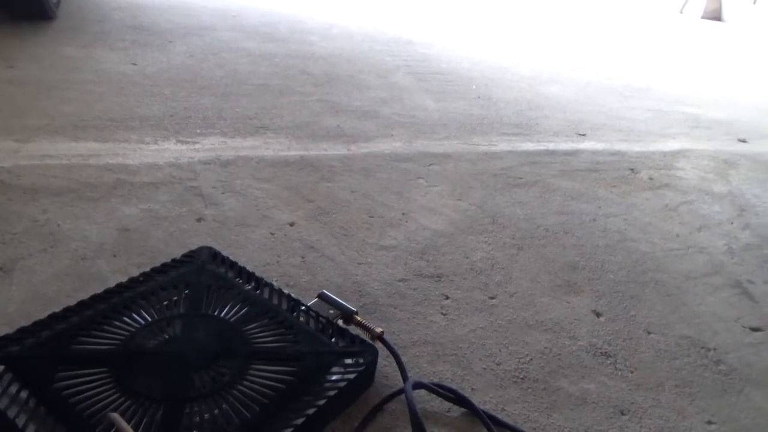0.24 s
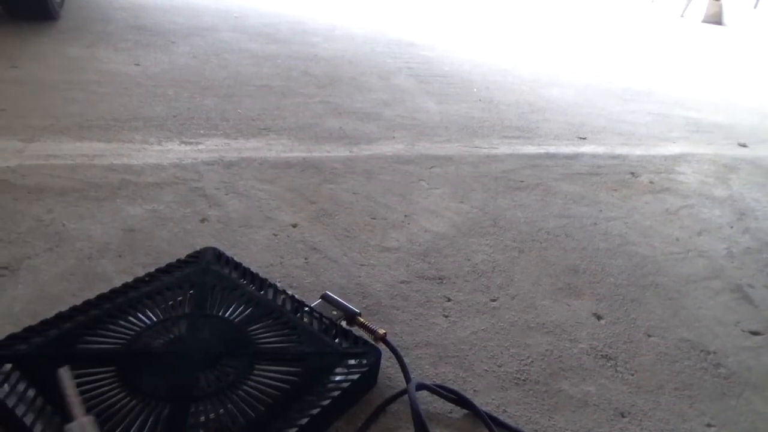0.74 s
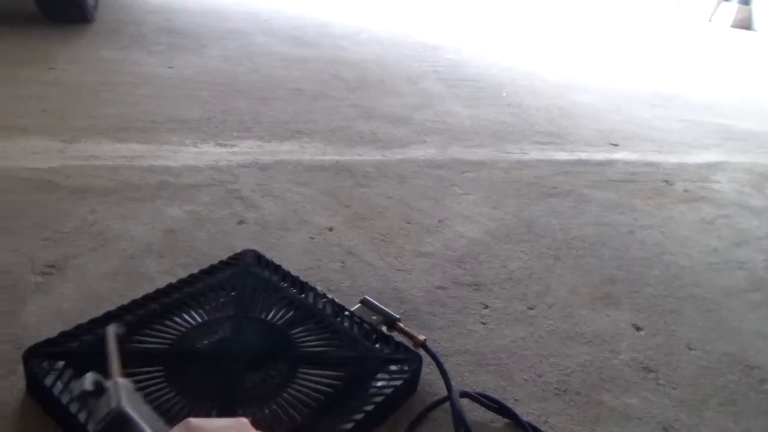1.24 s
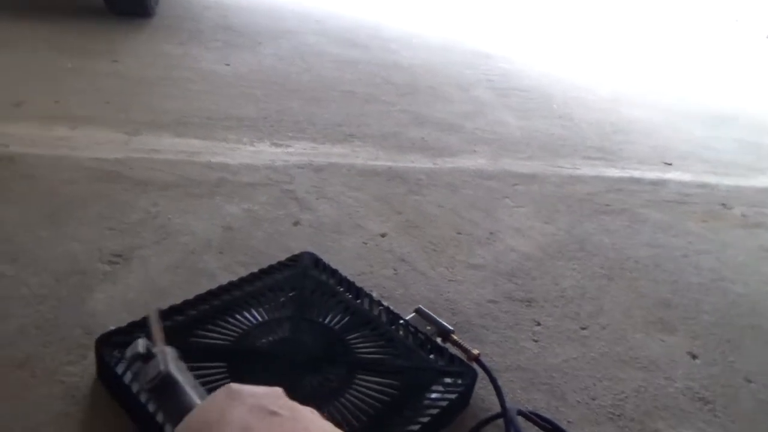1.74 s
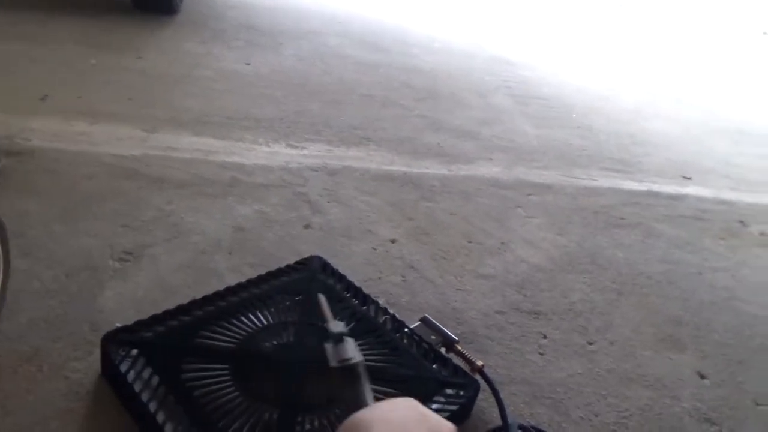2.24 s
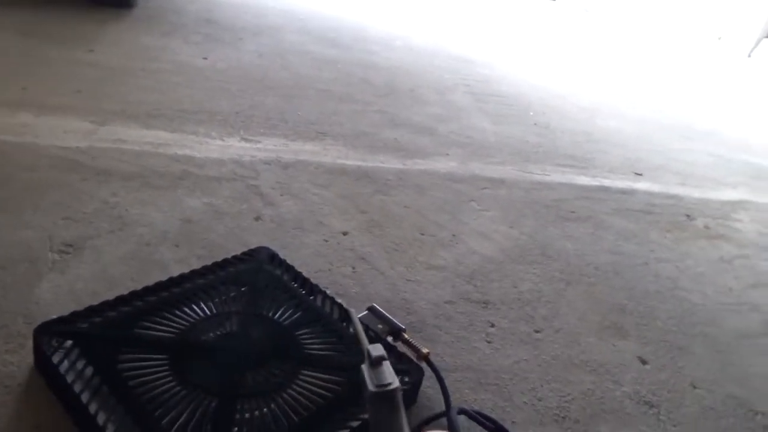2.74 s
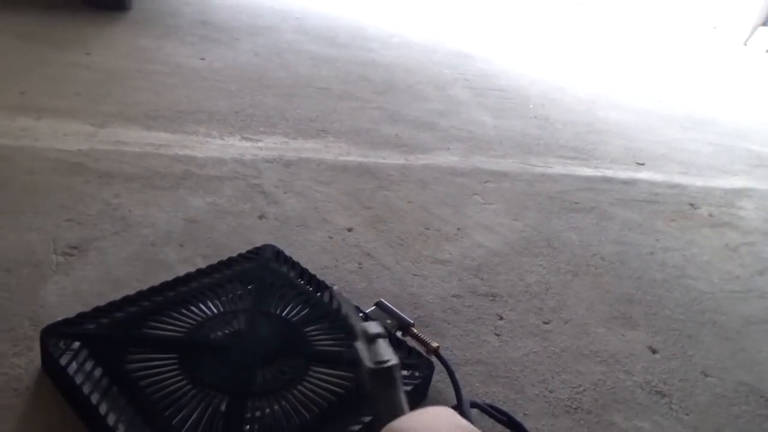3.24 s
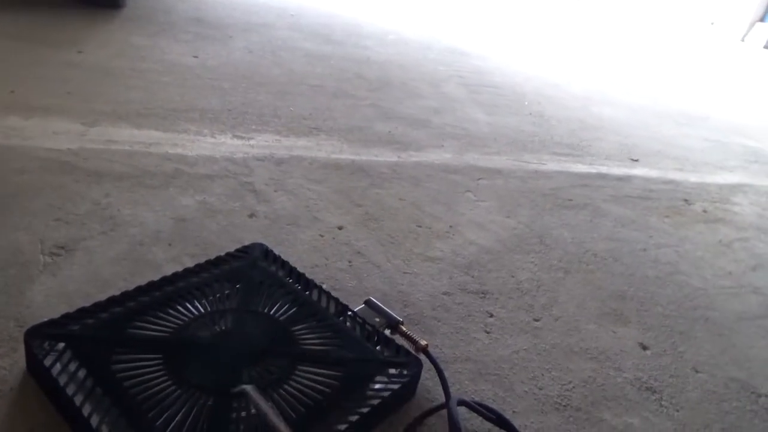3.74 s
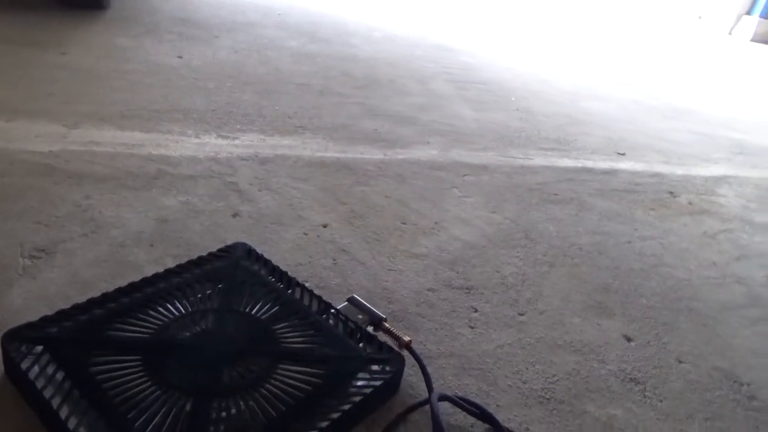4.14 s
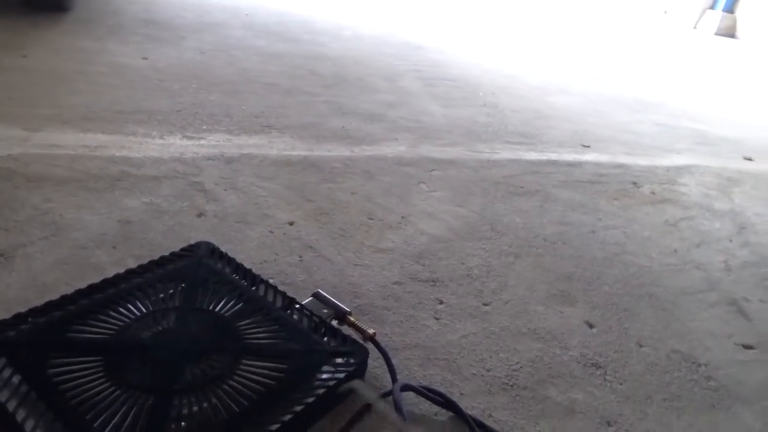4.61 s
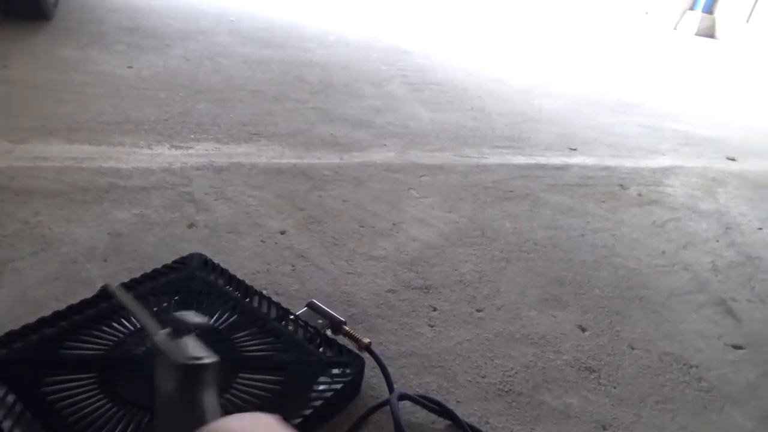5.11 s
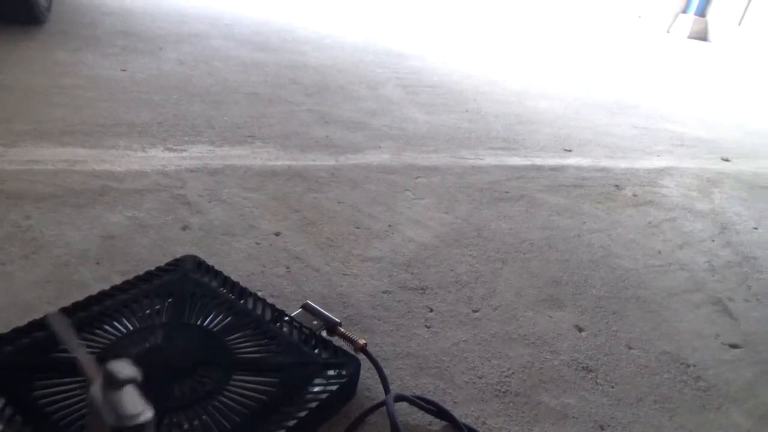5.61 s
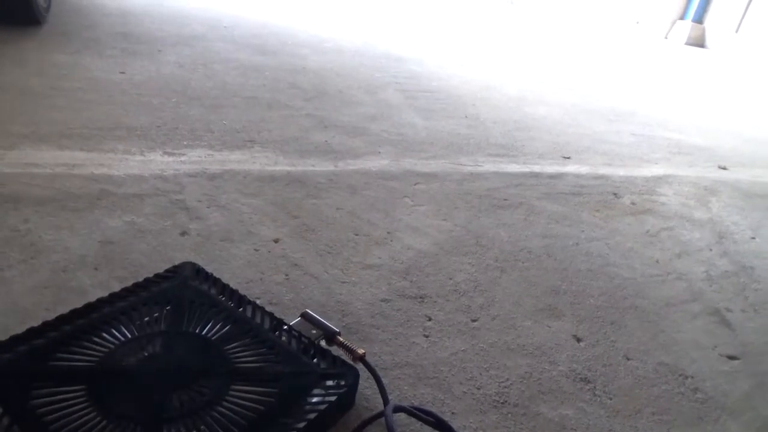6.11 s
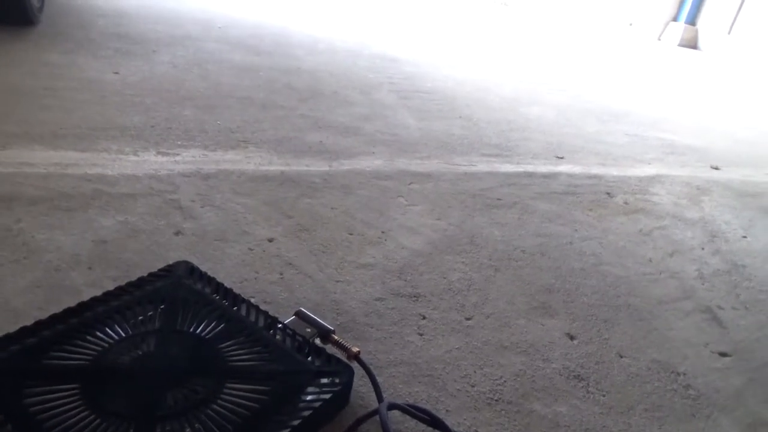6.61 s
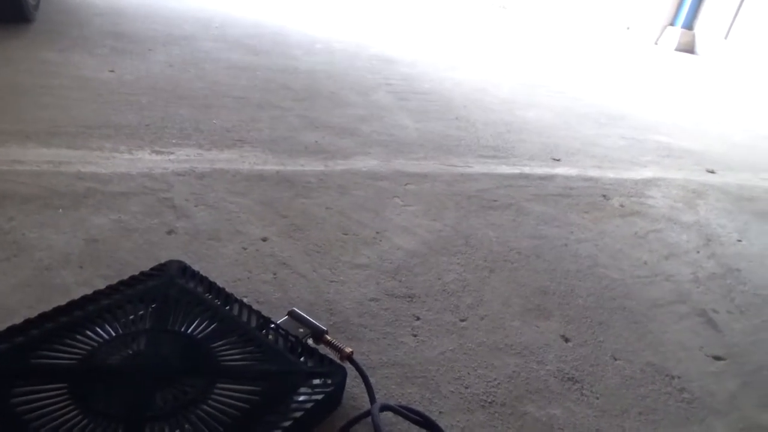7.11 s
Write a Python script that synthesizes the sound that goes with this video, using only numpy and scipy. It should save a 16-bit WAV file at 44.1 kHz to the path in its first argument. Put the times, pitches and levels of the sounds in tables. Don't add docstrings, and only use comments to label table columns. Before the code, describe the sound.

Harsh bright air jet brushes across plastic bars, puffing and tapping, then cuts off and returns weaker over a steady chugging compressor hum.

```python
import sys
import numpy as np
from scipy import signal
from scipy.fft import rfft, irfft, next_fast_len
from scipy.io import wavfile
from scipy.ndimage import uniform_filter1d, minimum_filter1d

SR = 44100
rng = np.random.default_rng(int(sys.argv[2]) if len(sys.argv) > 2 else 0)


def int16_out(signal):
    q = np.round(np.clip(np.atleast_2d(signal).T, -1, 1) * 32767)
    wavfile.write(sys.argv[1], SR, q.astype(np.int16))


def level_to_linear(level):
    exponent = np.asarray(level, float) / 20
    return 10 ** exponent


N = 324562
TURN_HZ = 28.89

# t/s, hiss level/dB, left-right difference/dB
FLOW = [(0.0, -19, 2), (0.62, -18.5, 3.0), (1.2, -16, 2), (1.6, -18.5, 2.0), (2.2, -14.5, 1), (2.6, -17, 0),
        (3.5, -17.5, 0.5), (3.95, -17.5, 1.3), (4.3, -17, 1), (4.84, -14, 0.5), (4.97, -19.5, 2.5),
        (5.35, -20, 3), (6.28, -21, 4), (6.33, -23.5, 5), (6.6, -25, 4.5), (6.94, -26.5, 5),
        (7.36, -27.5, 6.5)]
# t/s, level/dB
SLOW_GAIN = [(0, -44), (1.0, -43.5), (1.5, -41.5), (2.0, -39), (2.2, -44), (2.5, -39.5), (3.35, -39.5),
             (3.75, -40.5), (4.2, -42.5), (4.7, -41), (5.05, -39), (5.5, -43.5), (6.0, -41), (6.2, -42),
             (6.4, -38), (7.36, -35.5)]
# middle t/s, length/s, loss/dB
LIMITED = [(.145, 0.042, 2), (.5, 0.2, 4), (.72, 0.11, 7), (.945, 0.085, 4.5), (1.16, 0.45, 3),
           (1.275, 0.079, -3), (1.37, 0.17, 5), (1.565, 0.05, 1), (2.09, 0.11, 2.5), (2.33, 0.22, 1),
           (2.64, 0.039, 7), (2.745, 0.082, 8), (2.84, 0.084, 2), (2.95, 0.1, 2.5), (3.125, 0.034, 6),
           (3.295, .05, 1), (3.5, 0.17, 4.5), (3.89, 0.14, 7.5), (3.97, 0.086, 2), (4.07, 0.13, 8),
           (4.29, 0.11, 2.5), (4.79, 0.14, 4.5), (4.92, .06, 1.5), (5.21, 0.054, 5), (5.35, 0.049, 3),
           (5.51, 0.11, 2), (5.78, 0.21, 2.5), (6.27, 0.11, 2.5)]


def rms_one(x):
    return x / np.sqrt(np.mean(x ** 2) + 1e-20)


def in_time(rows):
    s, *columns = np.transpose(rows)
    return [np.interp(np.arange(N) / SR, s, c) for c in columns]


def at_hz(points, hz):
    table_hz, value = np.transpose(points)
    return np.interp(np.log(hz), np.log(table_hz), value)


def every_sample(v):
    return np.interp(np.arange(N) / 64, np.arange(len(v)), v)


def swells(rows, flat=0.3):
    middle, length = np.transpose(rows)[:2, :, None]
    apart = np.abs(np.arange(0, N + 64, 64) / SR - middle) * 2 / length
    return np.cos(np.pi / 2 * np.clip((apart - flat) / (1 - flat), 0, 1)) ** 2


def losses(rows, flat):
    return every_sample(np.transpose(rows)[2] @ swells(rows, flat))


def drift(rate):
    r = np.exp(-80 * np.pi * rate / SR)
    slow = signal.lfilter([1], [1, -2 * r, r * r], rng.standard_normal(N // 40 + 2002))[2000:]
    return np.interp(np.arange(N) / 40, np.arange(len(slow)), rms_one(slow))


def resonate(x, hz, width_hz):
    r = np.exp(-np.pi * width_hz / SR)
    numerator = np.array([1, 0, -1]) * (1 - r * r) / 2
    return signal.lfilter(numerator, [1, -2 * r * np.cos(2 * np.pi * hz / SR), r * r], x)


def band(x, low_hz, high_hz):
    return signal.sosfilt(signal.butter(2, [low_hz, high_hz], "band", fs=SR, output="sos"), x)


def panned(x, db):
    return x * level_to_linear(np.array([db / 2, -db / 2]).reshape(2, -1))


def spread(mid, side, alike):
    return np.sqrt(1 + alike) * mid + np.sqrt(1 - alike) * side * [[1], [-1]]


def stereo_noise(spectrum, alike):
    size = next_fast_len(N)
    hz = np.maximum(np.arange(size // 2 + 1) * SR / size, 1)
    white = rfft(rng.standard_normal((2, size)))
    mid, side = irfft(white * level_to_linear(at_hz(spectrum, hz)), size)[:, :N]
    return rms_one(spread(mid, side, alike))


def blow_gun(patchy_db=1.34):
    # f/Hz, density level/dB per Hz
    jet_colour = [(1150, -24), (1600, -20), (3000, -16), (5000, -13), (6500, -10), (7800, -0.5),
                  (8800, -11), (10000, 1), (13000, -49)]
    # f/Hz, coherence/1
    likeness = [(600, 0.58), (1200, 0.75), (2400, 0.86), (5000, 0.85), (10000, .96)]
    hiss_db, pan_db = hiss()
    edge_db, edge_hz = edge_noise(hiss_db)
    roar_db, cavity_hz = cavity_roar(hiss_db)
    gust_db = gust(hiss_db)
    flutter = drift(6.8)
    white = rng.standard_normal((2, 2, N))
    edges = 560 * 2 ** (np.arange(15) / 3)
    out = 0
    for k, (low, high) in enumerate(zip(edges, edges[1:])):
        mid, side = band(white[k % 2], low, high)
        hz = np.sqrt(low * high)
        weak = 0.81 * (hiss_db + 17) * max(np.log2(hz / 8000), 0)
        jet = level_to_linear(hiss_db + 9.5 + at_hz(jet_colour, hz) + weak)
        edge = level_to_linear(edge_db + 9.0 - 30.0 * np.log2(hz / edge_hz) ** 2)
        roar = level_to_linear(roar_db + 11.0 - 22.0 * np.log2(hz / cavity_hz) ** 2)
        dull_gust_db = 0.65 * roar_db + 1.2 * (gust_db + 44) - 8.0
        skirt = level_to_linear(dull_gust_db - 3.0 * np.abs(np.log2(hz / 1600)))
        flicker = level_to_linear(patchy_db * (0.5 * flutter + drift(50)))
        gain = np.sqrt((jet ** 2 + edge ** 2 + roar ** 2 + skirt ** 2) / 2) * flicker
        out = out + gain * spread(mid, side, at_hz(likeness, hz))
    return panned(floor_echo(out) + hollow_puffs() + whistles(), pan_db) + rumble(hiss_db)


def hiss():
    # middle t/s, length/s, loss/dB
    blocked = [(0.034, 0.061, 2.5), (0.255, 0.46, 1), (0.478, 0.11, 2.5), (0.6, 0.27, 2.5),
               (0.881, 0.57, 1.5), (0.889, 0.072, 3), (1.22, 0.373, 2), (1.263, 0.069, 5.5),
               (1.474, 0.281, 2.0), (1.648, 0.046, 2), (1.729, 0.042, 0.5), (1.755, 0.15, 3.5),
               (1.763, 0.043, 5.5), (1.903, 0.035, -1), (1.971, 0.87, 3), (1.986, 0.049, 5),
               (2.047, 0.072, -1.5), (2.144, 0.045, 0), (2.332, 0.49, 2.5), (2.431, 0.12, 1.5),
               (2.531, 0.18, 7), (2.656, 0.14, 0.5), (2.874, 0.082, 3.5), (2.894, 0.48, 1.5),
               (3.107, 0.05, -2.5), (3.149, 0.036, 3.5), (3.153, 0.35, 3.5), (3.182, 0.048, -4),
               (3.314, 0.054, 8), (3.385, 0.13, 2), (3.698, 0.38, 3.5), (3.769, 0.068, 3.5),
               (4.216, 0.092, 2.5), (4.284, 0.5, 2.5), (4.375, 0.11, 5), (4.431, 0.034, -0.5),
               (4.487, 0.39, 2.5), (4.927, 0.071, -2.5), (4.93, 0.56, 4), (5.221, 0.072, 3.5),
               (5.294, 0.093, 2), (5.423, 0.16, 3), (5.575, 0.071, 0), (5.647, 0.093, 2.5),
               (5.765, 0.74, 3), (6.17, 0.154, 3.5), (6.239, 0.08, 0), (6.326, 0.16, 4.5),
               (6.554, 0.52, 1.5), (6.938, 0.047, 0), (6.994, 0.31, 3), (7.16, 0.13, 1.5), (7.234, 0.14, 2)]
    release_s, reopen_s = 6.61, 6.93
    bleed_db_per_s, shut_db, leak_db_per_s, open_db_per_s = 210, 16, 31, 514
    flow_db, pan_db = in_time(FLOW)
    t = np.arange(N) / SR
    bleeding = bleed_db_per_s * (t - release_s)
    leaking = shut_db - leak_db_per_s * np.abs(t - release_s - .14)
    opening = open_db_per_s * (reopen_s - t)
    valve_loss = np.maximum(np.minimum(np.minimum(bleeding, opening), leaking), 0)
    return flow_db - losses(blocked, flat=0.3) - valve_loss, pan_db


def crossings(rows, rest_db, rest_hz):
    _, _, level_db, hz = np.transpose(rows)
    shape = swells(rows, flat=0.21) ** 2
    peak, rest = level_to_linear(level_db) ** 2, level_to_linear(rest_db) ** 2
    power = every_sample(peak @ shape) + rest
    centre_hz = (every_sample(peak * hz @ shape) + rest * rest_hz) / power
    return 10 * np.log10(power), centre_hz


def edge_noise(hiss_db):
    # middle t/s, length/s,
    # level/dB, centre f/Hz
    bars = [(0.099, 0.53, -25, 6200), (0.335, 0.23, -27.5, 6300.0), (0.519, 0.27, -26, 6750),
            (0.724, 0.057, -26.5, 6300.0), (0.785, 0.043, -26, 3900.0), (0.812, 0.564, -28, 6270),
            (0.892, 0.083, -26.5, 5300.0), (1.272, 0.227, -28, 5360.0), (1.524, 0.45, -30, 5260.0),
            (1.615, 0.07, -27, 4400.0), (1.673, 0.037, -26, 5250), (2.113, 0.13, -23, 6300.0),
            (2.129, 0.1, -23, 3900.0), (2.204, 0.4, -27, 6040.0), (2.25, 0.043, -25, 3900.0),
            (2.442, 0.056, -25, 4360.0), (2.621, 0.047, -20, 4860), (2.754, 0.41, -28.5, 5750.0),
            (2.826, 0.141, -27.5, 5680.0), (3.021, 0.49, -26, 6700), (3.188, 0.144, -28, 6300.0),
            (3.351, 0.442, -34, 6300.0), (3.506, 0.085, -25.5, 5980.0), (3.684, 0.042, -29, 4980.0),
            (4.005, 0.087, -21.5, 6040.0), (4.057, 0.32, -27.5, 6300.0), (4.19, 0.069, -27, 6300.0),
            (4.21, 0.21, -27, 6300.0), (4.403, 0.13, -26, 6040), (4.483, 0.031, -24, 5820.0),
            (4.568, 0.144, -30, 6150.0), (4.809, 0.12, -24, 5680.0), (4.875, 0.58, -26, 4850),
            (5.132, 0.42, -23, 4290.0), (5.189, 0.237, -18, 5000.0), (5.415, 0.4, -24, 6300.0),
            (5.546, 0.033, -24, 4350.0), (5.768, 0.61, -22.0, 5050), (5.873, 0.11, -17, 4450.0),
            (6.21, 0.55, -28, 5600), (6.215, 0.038, -29, 5470.0), (6.44, 0.12, -36, 4990.0),
            (6.51, 0.39, -29.5, 5730), (7.055, 0.54, -33, 5850), (7.355, 0.56, -31, 5660),
            (1.446, 0.035, -23, 2900), (1.448, 0.055, -22, 5200), (1.452, 0.044, -26, 3700),
              (1.487, 0.028, -21.5, 3800), (1.527, 0.026, -30, 4500), (1.544, 0.022, -33, 4300),
              (1.908, 0.024, -37, 4500), (2.719, 0.025, -19, 4100), (2.739, .03, -22, 3900),
              (2.654, .02, -27, 4300), (2.792, .03, -26, 4400), (2.812, .025, -22, 3900),
              (2.847, 0.02, -24, 5200), (3.052, .03, -26, 5100), (3.225, 0.027, -34, 5200),
              (3.403, 0.027, -27, 5000), (3.936, .03, -26, 5800), (4.57, 0.039, -30, 4300)]
    return crossings(bars, hiss_db - 16.0, 5500)


def cavity_roar(hiss_db):
    # middle t/s, length/s, level/dB, centre f/Hz
    gaps = [(0.046, 0.26, -30, 3180), (0.117, 0.025, -29, 3600.0), (0.186, 0.044, -26.5, 3280),
            (0.239, 0.39, -31.5, 3200), (0.591, 0.49, -30.5, 3600), (0.665, 0.04, -30, 3500),
            (0.884, 0.14, -29, 3030), (0.961, 0.083, -32, 2980.0), (1.112, 0.28, -30, 3160),
            (1.266, 0.061, -31, 3000.0), (1.466, 0.08, -35, 3600), (2.145, 0.12, -29, 2380.0),
            (2.243, 0.069, -31, 2100.0), (2.441, 0.016, -26, 2690.0), (2.444, 0.2, -38, 2250),
            (2.563, 0.11, -40, 2250.0), (2.65, 0.029, -25, 3370), (2.773, 0.28, -33, 3600.0),
            (3.172, 0.098, -35, 2490.0), (3.42, 0.17, -35, 2900), (3.663, 0.11, -29, 1780),
            (3.778, 0.19, -36, 3420.0), (3.816, 0.04, -28.5, 3140), (3.967, 0.096, -29, 3600.0),
            (4.202, 0.2, -30, 3000), (4.329, 0.076, -33.5, 2360.0), (4.402, 0.304, -38, 2570.0),
            (4.432, 0.046, -27.5, 2430.0), (4.602, 0.23, -28.5, 2520), (4.827, 0.15, -27, 2700),
            (4.976, 0.33, -29, 1700.0), (5.039, 0.56, -26, 2480), (5.191, 0.34, -23, 3200),
            (5.416, 0.3, -29, 3570), (5.45, 0.09, -23.5, 3080), (5.646, 0.13, -21.5, 3670),
            (5.649, 0.43, -28.5, 3050), (5.817, 0.58, -26, 3250), (5.903, 0.097, -27, 2590.0),
            (5.964, 0.062, -38, 1700.0), (6.176, 0.18, -28.5, 2730), (6.242, 0.75, -33, 2270),
            (6.33, 0.15, -26, 2400), (6.479, 0.41, -36, 3560), (6.92, 0.072, -48, 2050.0),
            (7.2, 0.64, -34, 3270)]
    return crossings(gaps, hiss_db - 21.0, 2600)


def gust(hiss_db):
    # middle t/s, length/s, loss/dB
    lulls = [
        (.35, 0.31, 13),
        (1.0, .15, 3),
        (1.36, 0.28, 8),
        (2.9, 0.79, -2),
        (4.05, .3, 0),
        (6.5, 0.3, 5),
        (7.15, 0.69, 3.5),
    ]
    starved_db = np.minimum(hiss_db + 29, 0)
    return in_time(SLOW_GAIN)[0] - losses(LIMITED, flat=.5) + starved_db - losses(lulls, flat=.4)


def floor_echo(x, share=0.2):
    late = np.arange(N) - SR * 0.000873 * level_to_linear(2.88 * drift(2.48))
    echo = np.array([np.interp(late, np.arange(N), c) for c in x])
    return (x + share * echo) / np.sqrt(1 + share ** 2)


def hollow_puffs():
    # start t/s, length/s, level/dB, first resonance f/Hz, second resonance f/Hz
    hollows = [
        (2.114, 0.056, -24.5, 2210, 2840),
        (4.894, 0.18, -25, 1570, 2300),
        (6.124, 0.11, -24.5, 1690, 3150),
        (6.286, 0.084, -23, 1620, 3270),
    ]
    out = np.zeros(N)
    for start, length, level_db, first_hz, second_hz in hollows:
        swell = signal.windows.tukey(round(length * SR), .6)
        air = rng.standard_normal(8000)[:len(swell)]
        first = resonate(resonate(air, first_hz, 700), first_hz, 700)
        second = resonate(resonate(air, second_hz, 800), second_hz, 800)
        tone = rms_one(first - 0.74 * second)
        out[round(start * SR):][:len(swell)] += level_to_linear(level_db) * tone * swell
    return out


def whistles():
    # middle t/s, length/s, level/dB, start f/Hz, end f/Hz
    rims = [(0.72, .12, -25, 6800, 7170), (0.845, .12, -28, 7380, 7450), (0.95, .14, -35, 5700, 5520),
            (1.514, .13, -34, 4100, 4090), (1.752, .1, -40, 4050, 4200), (1.81, .1, -40, 7200, 7200),
            (2.21, .13, -34, 3970, 3950), (2.55, .07, -28, 9100, 9100), (4.585, .11, -32, 4270, 4460),
            (4.96, .15, -31, 3880, 3880), (5.33, .12, -28, 6370, 6420), (5.369, .11, -29, 4010, 3920),
            (5.788, .1, -31, 6450, 6550), (6.18, .16, -35, 4420, 4420), (6.282, .11, -26.5, 7640, 7650),
            (6.354, .12, -33, 1995, 1900), (6.643, .1, -43, 5725, 5725), (6.99, .1, -34, 6900, 7460),
            (7.071, .18, -37.5, 3550, 4600), (7.172, .14, -42, 7900, 7760), (7.218, .17, -35.5, 4600, 4500)]
    width_hz = 300
    lowpass = signal.butter(2, width_hz / 2, fs=SR, output="sos")
    out = np.zeros(N)
    for middle, length, level_db, start_hz, end_hz in rims:
        count = round(length * SR)
        air = rng.standard_normal((2, 14000))
        real, imag = signal.sosfilt(lowpass, air)[:, 2000:][:, :count]
        phase = 2 * np.pi * np.cumsum(np.linspace(start_hz, end_hz, count)) / SR
        tone = rms_one(real * np.cos(phase) + imag * np.sin(phase))
        swell = signal.windows.tukey(count, .7)
        out[round(middle * SR) - count // 2:][:count] += level_to_linear(level_db) * tone * swell
    return out


def rumble(hiss_db):
    # f/Hz, density level/dB per Hz
    roll_colour = [(25, -13), (60, -9), (110, -1), (200, -1), (290, 5), (360, 11), (600, 15), (900, -2),
                   (2000, -60)]
    level_db = -52.5 + 0.27 * (hiss_db + 19.0) - 0.38 * losses(LIMITED, flat=.5) + 3.9 * drift(11)
    return level_to_linear(level_db) * stereo_noise(roll_colour, alike=0.92)


def ticks():
    # t/s, peak level/dB, f/Hz, length/cycles
    contacts = [
        (2.4352, -4.5, 3200, 0.7),
        (2.4375, -15, 4300, 3.0),
        (2.4388, -15, 2300, 2.5),
        (4.3722, -17, 6300, 6.0),
        (4.3745, -12, 6200, 3.5),
        (5.45, -14, 2500, 1.0),
        (6.634, -31, 2060, 4.0),
        (6.903, -26, 2150, 3.0),
        (6.901, -30, 2800, 3.0),
        (6.949, -31, 2200, 4.0),
    ]
    out = np.zeros(N)
    age = np.arange(-500, 500) / SR
    for s, peak_db, hz, cycles in contacts:
        ring = np.cos(2 * np.pi * hz * age) * np.exp(-(age * hz / cycles) ** 2)
        out[round(s * SR) - 500:][:1000] += level_to_linear(peak_db) * ring
    return panned(out, 1.9)


def compressor():
    turns = crank_turns()
    slam_db = 5 * rng.standard_normal(512)[np.floor(turns).astype(int) % 512]
    knock = rms_one(each_turn(knock_cycle(), turns) + level_to_linear(slam_db) * each_turn(valve_cycle(), turns))
    pumping_db = 1.5 * drift(20) * np.clip((in_time(FLOW)[0] + 27) / 6, 0, 1)
    level_db = in_time(SLOW_GAIN)[0] - losses(LIMITED, flat=0.44) + pumping_db
    return level_to_linear(level_db) * (level_to_linear(3.0) * knock + level_to_linear(-1.5) * rattle(turns))


def crank_turns():
    # t/s, f/Hz
    speed = [(0, 28.877), (3.7, 28.877), (4.5, 28.89), (5.5, 28.9), (7.36, 28.906)]
    top_stroke_s = 6.9313
    turns = np.cumsum(in_time(speed)[0]) / SR
    return turns - turns[round(top_stroke_s * SR)]


def each_turn(cycle, turns):
    where = np.arange(2048) / 2048
    return np.array([np.interp(turns % 1, where, c, period=1) for c in cycle])


def knock_cycle():
    # multiple of turn rate/1, level/dB
    harmonics = [(1, -44), (2, -36), (3, -32), (4, -21), (5, -19), (6, -25), (7, -17), (8, -22), (9, -22),
                 (10, -17), (11, -15), (12, -6), (13, -1), (14, -9), (15, -4), (16, -10), (17, 0), (18, -9),
                 (19, -4), (20, -4), (21, -7), (22, -8), (23, -16), (24, -4), (25, -1), (26, -6), (27, -17),
                 (28, -18), (29, -12), (30, -9), (31, -7), (32, -5), (33, -9), (34, -14), (35, -8),
                 (36, -19), (37, -15), (38, -10), (39, -16), (40, -12), (41, -11), (42, -7), (43, -11),
                 (44, -8), (45, -5), (46, -7), (47, -12), (48, -11), (49, -15), (50, -16), (51, -14),
                 (52, -21)]
    # delay after the valve slam/ms, signed strength/1
    knocks = [
        (0, 1),
        (1.0, -.2),
        (5.6, .45),
        (8.4, .3),
        (11.4, .22),
        (14.4, .25),
        (16.3, .28),
        (25.6, -.5),
        (30.5, .22),
    ]
    # f/Hz, difference/dB
    housing_side = [(60, 0.5), (110, 0.0), (190, 0.0), (340, 1.0), (590, 3.0), (1060, 5.0), (1870, 5.0),
                    (3320, 6.5), (5900, 3.0), (10500, 2.0)]
    delay_ms, strength = np.transpose(knocks)
    where = np.arange(2048) / 2048
    cycle = np.zeros((2, 2048))
    for multiple, level_db in harmonics:
        hz = multiple * TURN_HZ
        timing = np.angle(np.sum(strength * np.exp(-2j * np.pi * hz * delay_ms / 1000)))
        timing += rng.normal() * min(np.pi, 25 / multiple ** 2 + .11)
        timing -= 2 * np.pi * hz * 0.00044 * (multiple > 35.5)
        cycle += panned(level_to_linear(level_db) * np.cos(2 * np.pi * multiple * where + timing), at_hz(housing_side, hz))
    return cycle


def valve_cycle():
    # f/Hz, level/dB, decay time/s
    modes = [
        (1900, 2, .003),
        (2137, 5, 0.0044),
        (2590, 8, 0.0035),
        (2860, 0, 0.0025),
    ]
    age = np.arange(2048) / 2048 / TURN_HZ
    plate = 0
    for hz, level_db, decay in modes:
        envelope = np.exp(-age / decay) * np.tanh(age / 0.0005) ** 2
        plate = plate + panned(level_to_linear(level_db) * np.sin(2 * np.pi * hz * age) * envelope, 4.0)
    return plate


def rattle(turns):
    # f/Hz, density level/dB per Hz
    rattle_colour = [(30, -54), (100, -33), (260, -28), (350, -23), (750, -19), (1350, -18.5), (1600, -24),
                     (2600, -15.5), (3400, -20), (7500, -23), (11000, -28)]
    noise = panned(stereo_noise(rattle_colour, alike=.65), 4.5)
    burst = np.exp(-((turns + 0.044) % 1) / 0.13)
    return noise + band(noise, 1500, 3400) * burst


def scene():
    return blow_gun() + ticks() + compressor()


def limiter(x):
    limit, hold_s = .52, .008
    span = round(hold_s * SR)
    gain = minimum_filter1d(limit / np.maximum(np.abs(x).max(axis=0), limit), size=span)
    return x * uniform_filter1d(gain, size=span)


def top_cut(x):
    return signal.sosfilt(signal.butter(12, 11060, fs=SR, output="sos"), x)


def record(dry):
    sharpened = dry + 0.34 * resonate(dry, 8470, 1540)
    dull = signal.sosfilt(signal.butter(4, 9850, fs=SR, output="sos"), sharpened)
    steep = signal.ellip(14, .5, 90, 10990, fs=SR, output="sos")
    mix = signal.sosfilt(steep, limiter(dull))
    return top_cut(mix)


dry = scene()
out = record(dry)
int16_out(out)
```